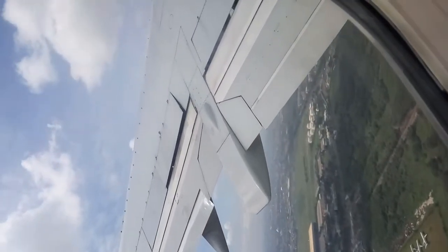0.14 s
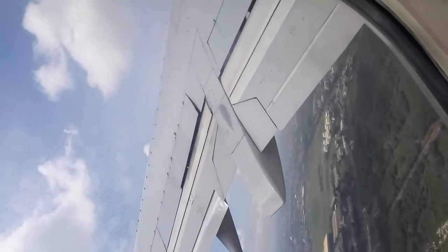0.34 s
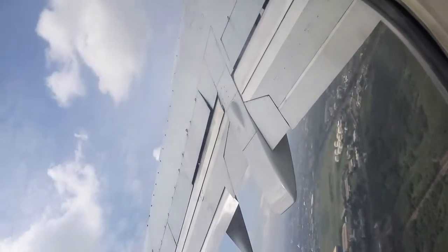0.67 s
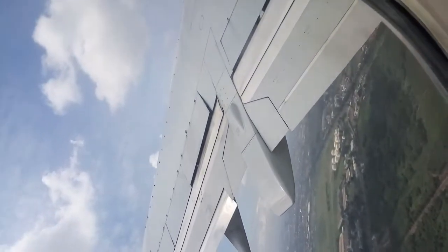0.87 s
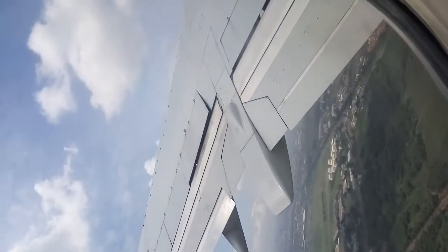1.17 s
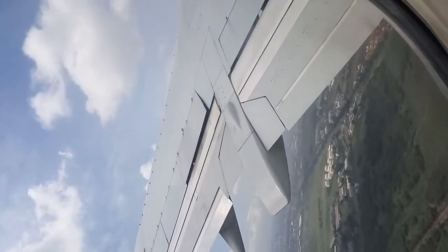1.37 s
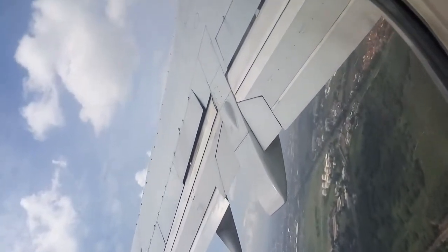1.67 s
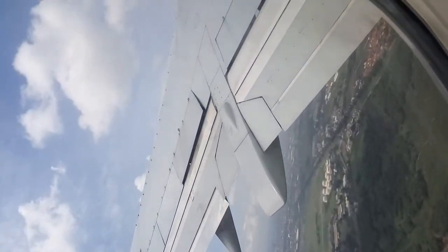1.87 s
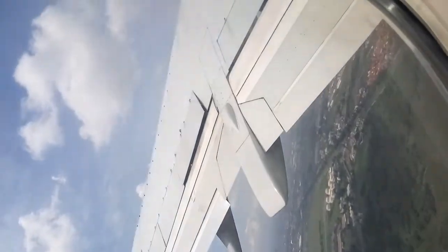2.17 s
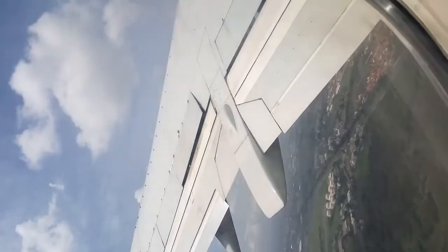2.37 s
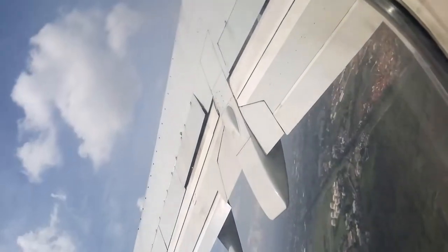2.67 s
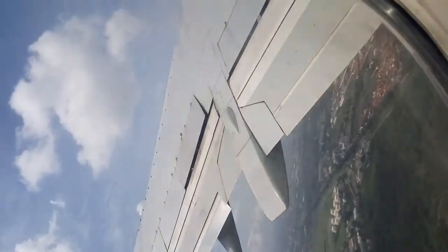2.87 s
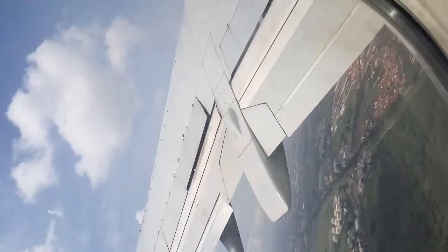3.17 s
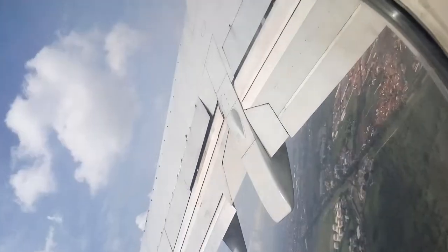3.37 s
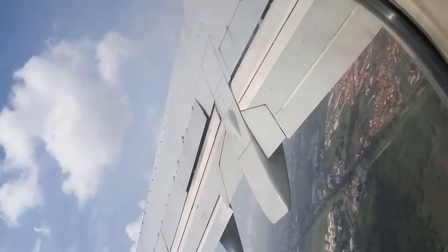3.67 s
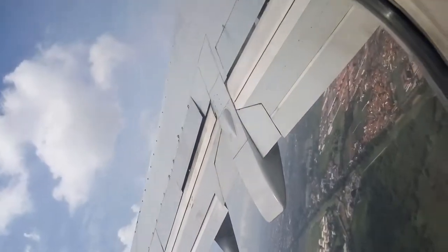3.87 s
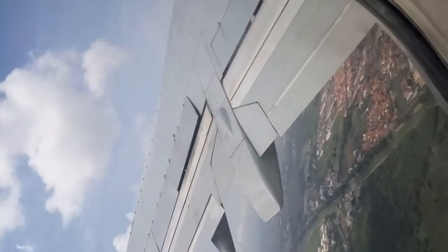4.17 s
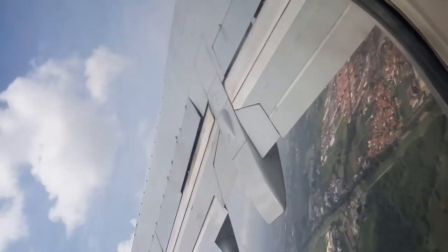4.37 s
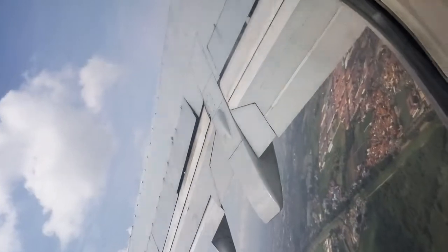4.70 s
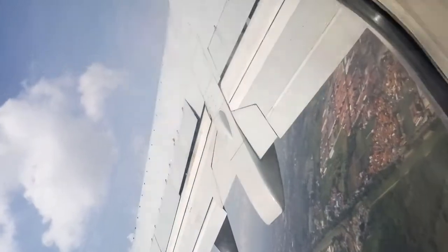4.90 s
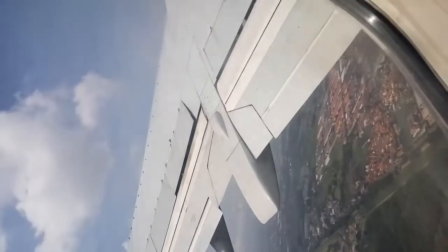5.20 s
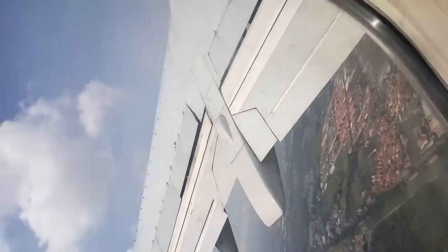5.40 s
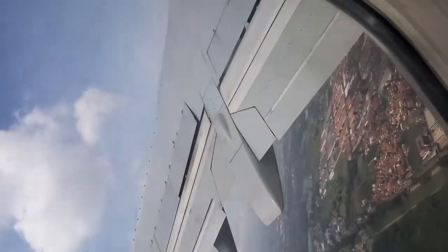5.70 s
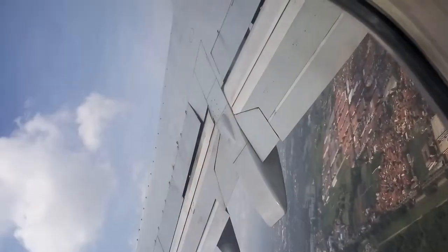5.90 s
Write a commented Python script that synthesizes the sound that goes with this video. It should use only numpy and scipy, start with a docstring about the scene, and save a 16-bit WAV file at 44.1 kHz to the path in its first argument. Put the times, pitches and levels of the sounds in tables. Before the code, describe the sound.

Steady cabin noise in flight: low engine rumble and drone surging gently, with airframe buffeting and brief low hums swelling out of it. Behind it lies a fainter, fluttering rush of air and thin hiss, with a barely audible high machine whine. A few faint dry scratches tick from the plastic window trim. The microphones sit near the wall in an enclosed cabin; the noise neither starts nor stops.

```python
"""Jet exhaust roars through the fuselage of a climbing airliner, heard at a window seat over the wing.
The roar is coloured noise that surges and drones in the cabin's modes, with brief low tones and buffeting.
Air rushes and hisses along the skin as noise swelling in gusts and eddies, with brief thin tones in it.
A faint machine whine of two sines stands above it, and scratch bursts ring the wall trim in ticks.
Two microphones a hand apart hear a diffuse field, and a gain control evens the level."""
import sys
import numpy as np
from scipy import signal
from scipy.fft import rfft, irfft
from scipy.io import wavfile
from scipy.ndimage import uniform_filter1d, minimum_filter1d

SR = 44100
rng = np.random.default_rng(int(sys.argv[2]) if len(sys.argv) > 2 else 0)


def transcribe(signal):
    """Save signal, clipped to [-1, 1], as a 16-bit WAV file at the path in sys.argv[1]."""
    frames = np.atleast_2d(signal).T
    limited = np.clip(frames, -1, 1)
    pcm = np.round(limited * 32767).astype(np.int16)
    wavfile.write(sys.argv[1], SR, pcm)


N = 266805

# Air modes of the cabin. Each row: centre in Hz, width in Hz, lift in dB, left-right difference in dB,
# phase between the microphones in radians, share held at that phase (0-1).
CABIN_MODES = [(190.3, 33, 6, -2, 0, 0.7), (254.6, 58, 4, -2.5, -0.1, .6), (314.4, 30, 4, 4, -0.9, .9),
               (371.3, 23, 3.5, 1.5, 0.5, 0.8), (399.2, 28, 7.5, 5, 0.6, .6), (500, 270, 6, 0, 0.1, 1)]
ENGINE_PHASE = 0.18   # radians by which the left microphone trails in the engine layers


def engines(lumpy_db=0.45, lumps_per_s=9):
    """Exhaust roar surges and drones in the cabin's modes, with a narrow boom and lumpy airframe buffeting."""
    # Spectra of roar, drone, boom and buffeting. Each row: frequency in Hz, density in dB per Hz
    # (relative: each noise is scaled to unit rms).
    roar_colour = [(60, -50), (104, -14.5), (128, 0.5), (175, -1.84), (235, -2), (265, -7.5), (290, -19.5),
                   (400, -53.5)]
    drone_colour = [(220, -34), (268, -12.5), (300, -6.5), (350, -13.5), (440, -24.5), (540, -26),
                    (700, -47), (1500, -76)]
    boom_colour = [(110, -49), (139, -24), (147, 4.5), (153, 6.5), (160, 4.5), (168, -22), (215, -51)]
    buffet_colour = [(8, -13.5), (24, -8), (39, -16), (50, -8), (62, -0.5), (88, 2.5), (116, 0), (150, -10),
                     (300, -86.5)]
    # Faders of the same four layers, ahead of any swells. Each row: time in seconds, level in dB.
    roar_level = [(0.0, -12.5), (0.4, -16.5), (1.05, -13), (2.05, -16), (2.3, -12), (2.95, -14.5),
                  (4.9, -14), (6.05, -13)]
    drone_level = [(0.0, -22.5), (0.16, -22), (0.35, -21.5), (0.5, -22), (0.75, -24.5), (0.95, -20),
                   (1.25, -23), (1.55, -21.5), (1.8, -22.5), (2.0, -22), (2.25, -23.5), (2.38, -20.5),
                   (2.5, -20.5), (2.72, -25), (3.0, -21.5), (3.25, -23), (3.5, -21), (3.73, -23.5),
                   (4.05, -21.5), (4.27, -23), (4.42, -22), (4.53, -24.5), (4.75, -21.5), (4.88, -25),
                   (5.08, -22), (5.45, -23.5), (5.8, -22), (5.93, -22), (6.05, -18)]
    boom_level = [(0.0, -25.5), (1.3, -27), (1.6, -17), (2.3, -26.5), (2.8, -21.5), (3.5, -20), (4.05, -22),
                  (4.5, -18.5), (4.87, -23), (5.15, -24.5), (6.05, -18)]
    buffet_level = [(0.0, -20.5), (0.2, -17.5), (0.42, -24.5), (0.8, -20.5), (1.05, -16.2), (1.3, -21),
                    (1.55, -14.5), (1.8, -20), (2.05, -16), (2.25, -19), (2.55, -22.5), (2.95, -15.5),
                    (3.35, -22.5), (3.55, -19), (3.95, -19.5), (4.35, -16), (4.8, -20.5), (5.2, -16.5),
                    (5.52, -20.5), (6.05, -17)]
    # Surges and lulls of the roar; bumps and lulls of turbulence in the buffeting.
    # Each row: middle in seconds, lift in dB, half length in seconds.
    surges = [(0.6, -2.5, 0.021), (1.08, 5, 0.051), (1.55, 2, .07), (1.8, 4.5, 0.075), (2.23, 5, .05),
              (2.93, 0.5, 0.054), (3.38, 1, 0.044), (3.57, -6, .04), (3.82, 2, 0.055), (5.0, 0, 0.041)]
    bumps = [(0.75, 0.5, .07), (1.77, 0, .04), (2.47, -2, .03), (3.53, 3.5, 0.031), (3.88, 0, 0.06),
             (4.15, 0, 0.045), (4.78, -0.5, 0.047), (5.17, 2.5, 0.056), (5.53, -5, 0.044)]

    roar = diffuse_noise(roar_colour, CABIN_MODES, likeness=0.99, balance_db=1.5, phase=ENGINE_PHASE)
    roar = steadied(roar, span_s=0.14) * gain_curve(roar_level) * swells(surges)

    drone = diffuse_noise(drone_colour, CABIN_MODES, likeness=0.78, balance_db=0.0, phase=ENGINE_PHASE)
    drone = steadied(drone, span_s=0.14) * gain_curve(drone_level)

    boom = diffuse_noise(boom_colour, [], likeness=0.97, balance_db=-3.0, phase=ENGINE_PHASE)
    boom = steadied(boom, span_s=0.81) * gain_curve(boom_level)

    buffet = diffuse_noise(buffet_colour, [], likeness=0.95, balance_db=1.5, phase=ENGINE_PHASE)
    buffet = steadied(buffet, span_s=0.22) * gain_curve(buffet_level) * swells(bumps)
    lumps = from_db(lumpy_db * drift(lumps_per_s))
    return buffet * lumps + roar + drone + boom


def low_tones(scatter=0.03, scatter_per_s=70, level_db=0.45):
    """Brief low tones swell and fade singly within the roar and buffeting, each placed by its pitch."""
    # Brief low tones. Each row: middle in seconds, pitch in Hz, level in dB ahead of the shared level_db
    # and the pan, half length in seconds.
    low_tone_events = [(0.34, 361.5, -25, 0.034), (0.43, 503, -34, .06), (0.6, 95, -14.5, 0.025),
                       (1.0, 338.3, -23.5, 0.054), (1.14, 107, -18, .045), (1.16, 380.4, -25.5, .04),
                       (1.33, 235.7, -13, 0.038), (1.34, 320, -20.5, 0.032), (1.65, 319, -23, 0.058),
                       (1.77, 203.7, -19, 0.095), (2.0, 441, -32.5, 0.045), (2.12, 69.2, -19.5, 0.075),
                       (2.53, 330, -24, .04), (2.73, 152.8, -13.5, .05), (2.91, 69.7, -14, .06),
                       (3.03, 366, -25.5, 0.06), (3.08, 64.3, -21, .045), (3.42, 243, -12.5, 0.036),
                       (3.46, 472, -34, 0.032), (3.5, 302, -20.5, .04), (3.62, 400.4, -27, .04),
                       (3.63, 509.5, -36.5, .04), (3.98, 490, -34, .04), (4.11, 150.9, -14, 0.084),
                       (4.6, 307, -22, .04), (4.86, 152, -12, 0.039), (4.98, 314.3, -20.5, 0.049),
                       (5.56, 475, -36, 0.075), (5.74, 146, -19, 0.034), (5.89, 248, -17.5, 0.047),
                       (5.96, 510.4, -32, .045)]
    out = np.zeros((2, N))
    for s, hz, tone_db, length_s in low_tone_events:
        _, balance_db, likeness = standing_waves(hz, CABIN_MODES, np.exp(1j * ENGINE_PHASE))
        phase = np.angle(likeness)
        tone = brief_tone(s, hz, tone_db + level_db, length_s, scatter, scatter_per_s, phase)
        out += tone * pan(balance_db)
    return out


def airflow(eddy_db=1.06, eddies_per_s=28, hiss_eddy_share=0.92, hiss_db=-54.5, hiss_follows=0.75):
    """The boundary layer shakes the panels and hisses; gusts and eddies move the hiss less than the rush."""
    # Spectra of the rush and the hiss. Each row: frequency in Hz, relative density in dB per Hz.
    rush_colour = [(250, -33), (480, -6.5), (600, 0), (730, -4), (900, -9), (1300, -17), (1750, -19.5),
                   (2250, -22.5), (2700, -31), (4000, -48.5)]
    hiss_colour = [(1200, -35), (2300, -1), (3000, 1.3), (3800, 1.3), (4700, -2.2), (5900, -3), (7100, -7),
                   (7900, -13.5), (10000, -16), (15500, -19.5)]
    # Resonances of window and trim panels, then of the gap between them. Each row: centre in Hz,
    # width in Hz, lift in dB, left-right difference in dB, phase between the microphones in radians,
    # share held at that phase (0-1).
    panel_modes = [(614, 100, 1, 0.5, -1.74, 0.41), (727, 48, 0.5, -1, 1.2, 0.43),
                   (809, 37, 3, 1.5, -0.5, 0.55), (887, 27, 4.5, -1.5, -1.5, .3),
                   (980, 50, 2, -3.5, -3.6, .35), (1107, 61, 5, 0.5, 1.5, .2),
                   (1240, 110, 0.5, 6.5, 1.5, .35), (1437, 89, 4, -2, 1, 0.17), (1760, 220, 1, -5, 3, .2),
                   (2080, 540, 5, -3.5, 1.5, .1), (2350, 400, 0.5, -3, 0.1, .6)]
    gap_modes = [(2636, 130, 4.5, -0.5, -0.75, 0.61), (3250, 250, 0, -3, -3, .5),
                 (3500, 160, -1.5, -1, -1.5, 0.3), (3900, 290, 1.5, -5.5, 1, .1),
                 (5340, 260, 3.5, 0.5, 1, .25), (5850, 540, 1.5, -3, -2, .1)]
    # Fader of the rush, ahead of gusts and eddies. Each row: time in seconds, level in dB.
    rush_level = [(0.0, -37.5), (0.7, -39.5), (1.2, -37.5), (2.8, -39), (3.6, -38), (4.3, -38.5),
                  (4.85, -39), (6.05, -38.5)]
    # Gusts and lulls. Each row: middle in seconds, lift in dB, half length in seconds.
    gusts = [(0.36, 1.5, 0.14), (0.485, 3, 0.024), (0.59, -1.5, .03), (0.69, 2.5, .03), (0.85, 2, 0.075),
             (1.09, -1, 0.056), (1.23, 0, 0.05), (1.43, 1, 0.023), (1.61, -1, .04), (1.969, 1.5, 0.053),
             (2.16, -1, 0.049), (2.48, 2.5, 0.037), (2.68, 1.5, 0.031), (3.64, 0.5, 0.091),
             (3.9, -2, 0.047), (4.0, 2, 0.028), (4.115, -3.5, 0.032), (4.19, 2.5, 0.022), (4.42, 1.2, 0.11),
             (4.6, -1, 0.039), (4.89, -1.5, 0.055), (5.05, 3, 0.055), (5.98, 2.5, 0.041)]
    # Treble of the rush against its body. Each row: time in seconds, level in dB.
    rush_treble = [(0.0, -1), (0.25, -0.5), (0.8, 1.5), (1.2, -0.5), (1.65, -2.5), (2.2, 0.2), (2.5, 0),
                   (3.3, 0.5), (3.9, -.5), (4.4, 0), (5.1, 0), (5.7, -1.3), (6.05, 1.5)]
    treble_edge_hz = 1500

    flow = gain_curve(rush_level) * swells(gusts)
    eddies = from_db(eddy_db * drift(eddies_per_s))

    rush = diffuse_noise(rush_colour, panel_modes, likeness=0.74, balance_db=1.5, phase=-0.63)
    rush = patchy(rush, patchy_db=2.0, span_s=0.063, span_hz=130)
    rush = steadied(rush, span_s=0.2) * flow
    high_pass = signal.butter(2, treble_edge_hz, "high", fs=SR, output="sos")
    treble = signal.sosfiltfilt(high_pass, rush)
    rush = rush + treble * (gain_curve(rush_treble) - 1)

    hiss = diffuse_noise(hiss_colour, gap_modes, likeness=0.83, balance_db=-0.5, phase=0)
    hiss = patchy(hiss, patchy_db=2.1, span_s=0.03, span_hz=130)
    # a power of a gain is a share of its swing in dB
    hiss = hiss * from_db(hiss_db) * (flow / flow.mean()) ** hiss_follows
    return eddies * rush + eddies ** hiss_eddy_share * hiss


def thin_tones(scatter_per_s=600):
    """Narrow, unsteady tones swell briefly out of the rush, each slightly shifted in phase between the ears."""
    # Brief tones. Each row: middle in seconds, pitch in Hz, level in dB, half length in seconds,
    # pitch scatter as a share of the pitch.
    tone_events = [(0.023, 2017, -50, 0.055, .01), (0.272, 877, -44.5, 0.04, 0.044),
                   (0.366, 1662, -47.5, 0.02, .08), (0.48, 5260, -50.5, 0.005, .002),
                   (0.494, 5300, -56.5, 0.004, 0.0019), (1.042, 2020, -47.5, 0.034, .002),
                   (3.599, 1583, -48.5, 0.022, .04), (4.225, 810, -36, 0.022, .01),
                   (4.472, 1033, -40, 0.013, .015), (4.75, 600, -38, .025, .04)]
    return sum(brief_tone(*row, scatter_per_s, rng.uniform(-1, 1)) for row in tone_events)


def whine(waver=0.0004, flicker_db=2.5):
    """A fast-spinning machine: two thin partials share a wavering speed and flicker at each microphone."""
    # Partials of the whine. Each row: frequency in Hz, rms level in dB ahead of flicker and pan.
    partials = [(2962, -71.3), (5925, -71.5)]
    turning = np.cumsum(1 + waver * drift(7.2)) / SR
    out = np.zeros((2, N))
    for hz, line_db in partials:
        for side in out:
            flicker = from_db(line_db + flicker_db * drift(5))
            side += flicker * np.sin(2 * np.pi * (hz * turning + rng.random()))
    return np.sqrt(2) * out * pan(-1.0)


def trim_ticks(level_db=-4.5):
    """The plastic trim slips in brief, decaying scratches of noise that ring its modes."""
    # Slips of the trim. Each row: start in seconds, strength in dB ahead of level_db,
    # decay time of the scratch in seconds.
    ticks = [(0.242, -46, 0.0017), (0.477, -45.5, .002), (0.685, -42.5, .004), (1.41, -36, 0.022),
             (1.801, -39.5, .003), (2.5742, -36, .004), (3.3055, -44.5, 0.0023), (4.1778, -44.5, 0.0031),
             (4.441, -41.5, 0.0031), (4.7523, -46, 0.0022), (5.6644, -44.5, 0.0018)]
    # Ringing of the plastic. Each row: frequency in Hz, relative level in dB, 60 dB decay in seconds.
    trim_modes = [(3900, -4.5, .007), (4700, -2, .005), (5450, 3.5, .007), (6450, -5, .005),
                  (7200, -8, 0.005), (8400, -13.5, .005)]
    slips = np.zeros((2, N))
    age = np.arange(SR // 10) / SR
    for s, tick_db, slip_s in ticks:
        scratch = rng.standard_normal((2, len(age))) * np.exp(-age / slip_s)
        start = int(s * SR)
        slips[:, start:start + len(age)] += from_db(tick_db) * scratch / np.linalg.norm(scratch[0])
    ringing = sum(from_db(mode_db) * ring(slips, hz, t60) for hz, mode_db, t60 in trim_modes)
    return from_db(level_db) * ringing


def diffuse_noise(colour, modes, likeness, balance_db, phase):
    """Turbulence from all sides, coloured and lifted at its resonances; the mean of both sides has rms 1."""
    mic_spacing_m, sound_speed = 0.125, 343   # metres, metres per second
    points_hz, points_db = np.transpose(colour)
    hz = np.arange(1, N // 2 + 2) * SR / N
    hz = hz[hz < points_hz[-1]]
    level_db = np.interp(np.log(hz), np.log(points_hz), points_db, left=-np.inf)

    # long waves reach both microphones alike, short ones do not; a positive phase makes the left trail
    spacing_likeness = np.sinc(2 * hz * mic_spacing_m / sound_speed)
    alike = np.clip(likeness, 0, 1) * spacing_likeness * np.exp(1j * phase)
    lift_db, side_db, alike = standing_waves(hz, modes, alike)

    # the common part leads where the sides are alike, the opposed part fills in the rest
    share = np.minimum(np.abs(alike), 1)
    mid, side = rfft(rng.standard_normal((2, N)))[:, :len(hz)]
    pair = np.sqrt(1 + share) * mid + np.sqrt(1 - share) * side * [[1], [-1]]
    pair = pair * np.exp(1j * np.angle(alike) * np.array([[-0.5], [0.5]]))
    noise = irfft(from_db(level_db + lift_db) * pan(balance_db + side_db) * pair, N)
    return noise / np.std(noise.mean(axis=0))


def standing_waves(hz, modes, likeness):
    """Each mode changes its band's level and balance and draws it to a phase between the microphones."""
    level_db = balance_db = 0
    for centre_hz, width_hz, lift_db, side_db, phase, share in modes:
        bell = 1 / (1 + (2 * (hz - centre_hz) / width_hz) ** 2)
        level_db = level_db + lift_db * bell
        balance_db = balance_db + side_db * bell
        likeness = likeness + np.clip(share, 0, 1) * bell ** 2 * (np.exp(1j * phase) - likeness)
    return level_db, balance_db, likeness


def brief_tone(s, hz, tone_db, length_s, scatter, scatter_per_s, phase):
    """A tone swells and fades around time s, its pitch scattering; phase lies between the microphones."""
    span = np.array([s - 3 * length_s, s + 3 * length_s])
    start, stop = np.clip((span * SR).astype(int), 0, N)
    t = np.arange(start, stop) / SR
    knots = rng.standard_normal(400)   # random pitch offsets, joined by straight lines
    wobble = np.interp((t - s) * scatter_per_s, np.arange(len(knots)) - len(knots) // 2, knots)
    turns = hz * (t - s + scatter * np.cumsum(wobble) / SR) + rng.random()
    swell = np.sqrt(2) * from_db(tone_db) * np.exp(-((t - s) / length_s) ** 2)
    out = np.zeros((2, N))
    out[:, start:stop] = swell * np.sin(2 * np.pi * turns + phase * np.array([[-0.5], [0.5]]))
    return out


def patchy(noise, patchy_db, span_s, span_hz, size=1024):
    """Eddies of different sizes come and go, so narrow parts of the sound swell on their own."""
    hz, s, cells = signal.stft(noise, SR, nperseg=size, noverlap=3 * size // 4)
    field = rng.standard_normal(cells.shape[1:])
    for axis, span in enumerate((span_hz / hz[1], span_s / s[1])):
        field = uniform_filter1d(field, max(round(span), 1), axis=axis)
    swelling = cells * rms_one(from_db(patchy_db * rms_one(field)))
    return signal.istft(swelling, SR, nperseg=size, noverlap=3 * size // 4)[1][:, :N]


def steadied(noise, span_s):
    """Noise without its own slow swells; the fast flutter stays."""
    power = uniform_filter1d(np.mean(noise ** 2, axis=0), max(int(span_s * SR), 1))
    return noise * np.sqrt(power.mean() / (power + 1e-12))


def swells(rows):
    """A (middle s, lift dB, half length s) table as a gain that rises or dips smoothly at each row."""
    t = np.arange(0, N, 100) / SR
    level_db = sum(lift_db * np.exp(-((t - s) / length_s) ** 2) for s, lift_db, length_s in rows)
    return gain_curve(np.transpose([t, level_db]))


def gain_curve(rows):
    """A (s, dB) table as a gain for every sample."""
    s, level_db = np.transpose(rows)
    return from_db(np.interp(np.arange(N) / SR, s, level_db))


def drift(rate):
    """Slow chance of rms 1 that changes about rate times a second."""
    hz = np.arange(N // 2 + 1) * SR / N
    return rms_one(irfft(rfft(rng.standard_normal(N)) / (1 + (hz / rate) ** 2), N))


def ring(clicks, hz, t60):
    """A unit click sets ringing a sine of starting height about 1 that falls 60 dB in t60 seconds."""
    r = from_db(-60 / (t60 * SR))
    w = 2 * np.pi * hz / SR
    return signal.lfilter([0, np.sin(w)], [1, -2 * r * np.cos(w), r * r], clicks + 1e-18)


def pan(balance_db):
    """Left and right gains for a level difference."""
    return from_db(np.array([[0.5], [-0.5]]) * balance_db)


def rms_one(x):
    """Scale to unit rms."""
    return x / np.sqrt(np.mean(x ** 2) + 1e-20)


def from_db(db):
    """Decibels to gain."""
    return 10 ** (np.asarray(db) / 20)


def gain_control(sound, span_s=0.03, share=0.33):
    """The recorder takes back a share of every swell in loudness, so the hiss ducks under the roar."""
    power = uniform_filter1d(np.mean(sound ** 2, axis=0), max(int(span_s * SR), 1)) + 1e-12
    swell_db = 10 * np.log10(power / power.mean())
    return sound * from_db(-share * swell_db)


def crest_ticks(sound, tick_db=-56.0, tick_hz=12100):
    """A faint, very high tick rings on each of the tallest crests, in proportion to its height."""
    threshold, t60 = 0.76, 0.007   # crest height, decay in seconds
    height = np.abs(sound.mean(axis=0))
    crests = signal.find_peaks(height, height=threshold, distance=SR // 100)[0]
    clicks = np.zeros(N)
    clicks[crests] = from_db(tick_db) * height[crests]
    return ring(clicks, tick_hz, t60)


def scene():
    """Everything heard at the seat."""
    return engines() + low_tones() + airflow() + thin_tones() + whine() + trim_ticks()


def record(dry):
    """Gain control evens the level, a look-ahead limiter eases the highest crests, and the top is cut."""
    ceiling, reach, cutoff_hz = 0.97, SR // 100, 15400   # reach in samples
    even = gain_control(dry)
    allowed = ceiling / np.maximum(np.abs(even).max(axis=0), ceiling)
    held = minimum_filter1d(allowed, 2 * reach)
    gain = uniform_filter1d(uniform_filter1d(held, reach), reach)
    limited = even * gain + crest_ticks(even)
    low_pass = signal.ellip(10, 0.1, 80, cutoff_hz, fs=SR, output="sos")
    return signal.sosfilt(low_pass, limited)


dry = scene()
out = record(dry)
transcribe(out)
```